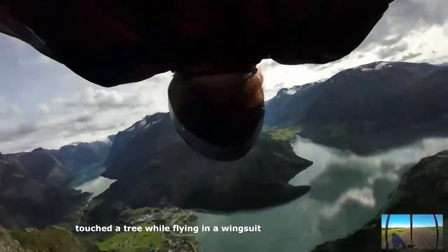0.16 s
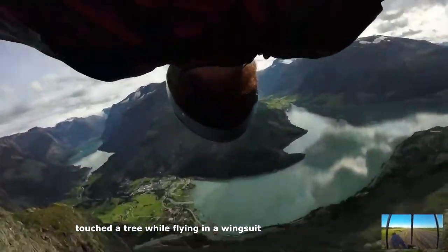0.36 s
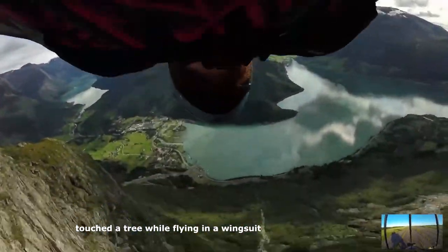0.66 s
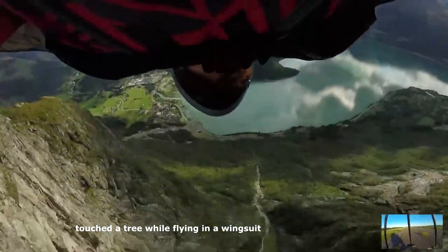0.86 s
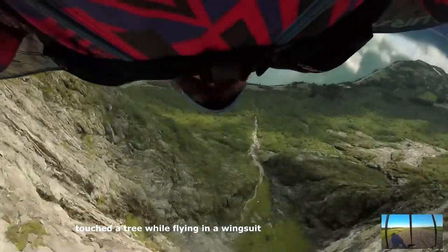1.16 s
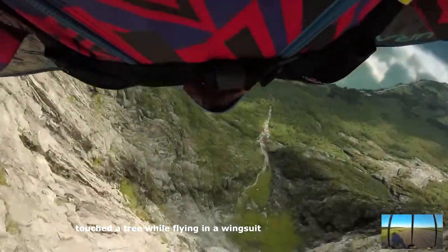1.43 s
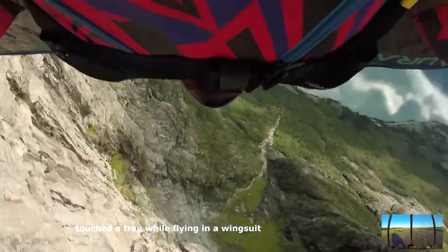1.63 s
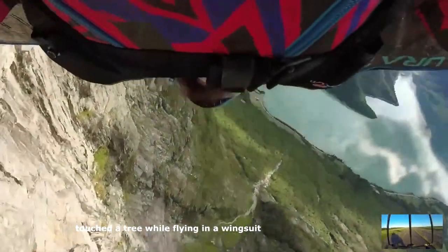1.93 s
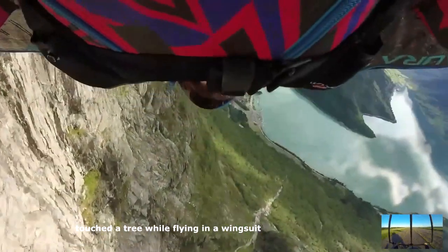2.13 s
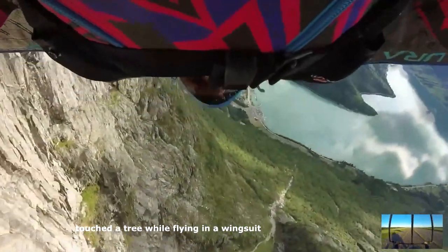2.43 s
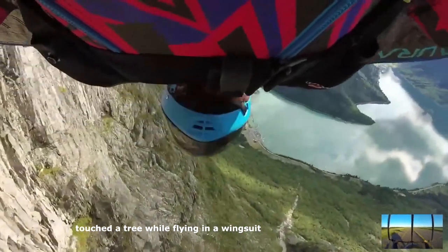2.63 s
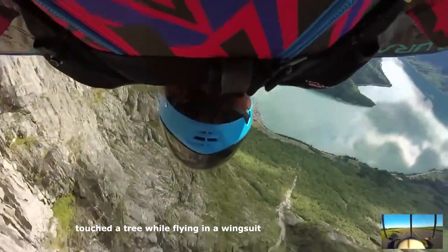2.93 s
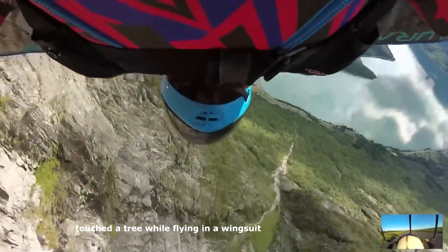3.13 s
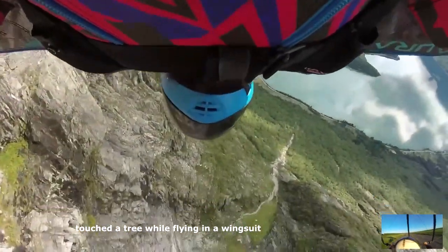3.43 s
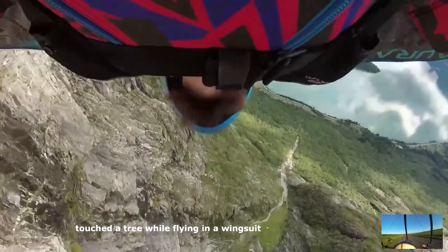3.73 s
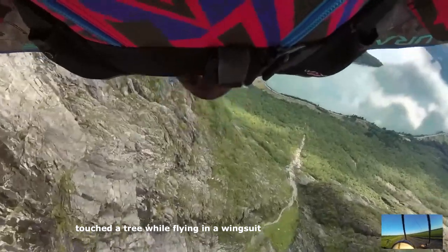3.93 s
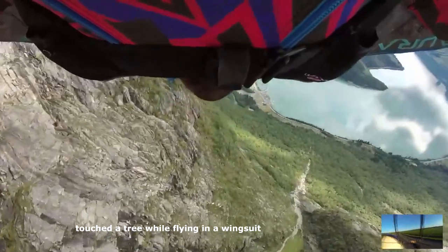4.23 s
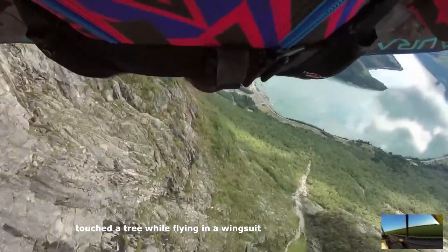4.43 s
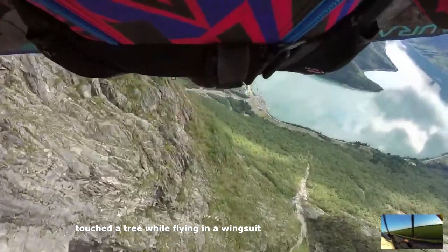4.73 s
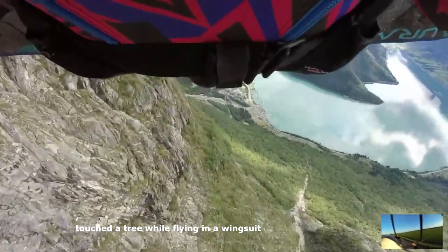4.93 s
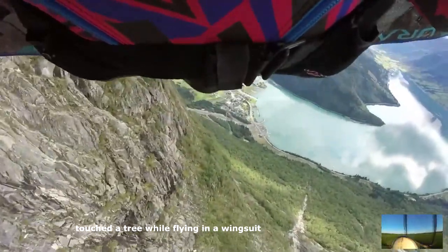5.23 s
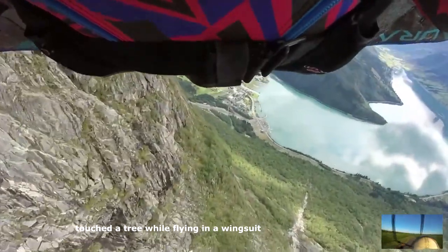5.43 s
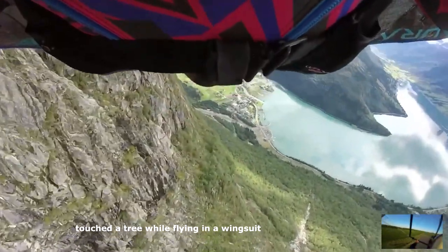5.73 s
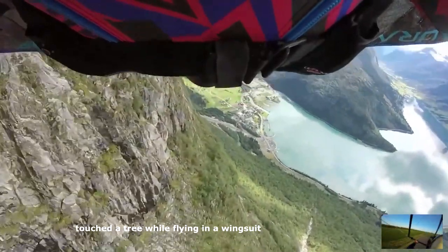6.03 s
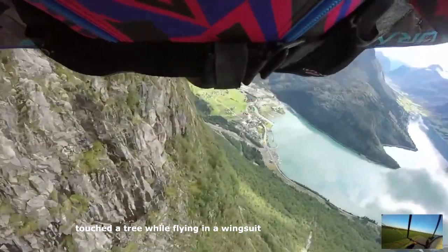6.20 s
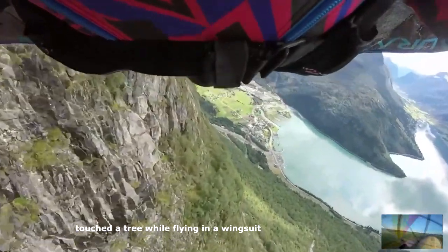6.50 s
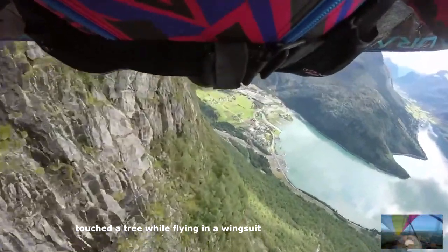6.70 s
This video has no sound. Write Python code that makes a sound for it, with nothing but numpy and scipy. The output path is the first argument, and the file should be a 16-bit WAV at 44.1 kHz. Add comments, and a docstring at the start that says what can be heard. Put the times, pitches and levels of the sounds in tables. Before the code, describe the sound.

Continuous close wind noise in high-speed flight: low turbulent roar, deep soft thumps, brief rough slaps, and airy hiss that brightens and dulls.

```python
"""Air tears past a body-worn camera during a fast wingsuit glide along a cliff, right at the microphone.
Eddies buffet the diaphragm with a low roar: noise in bursts, split into large and small eddies.
Fine turbulence rushes and hisses through the hollows of the camera housing: filtered noise with resonances.
Behind these lie the rumble of the body's wake, damped single thumps and short slaps of rough air.
The airstream flutters, and brightens or dulls as the flyer's posture turns the camera in and out of it."""
import sys
import numpy as np
from scipy import signal
from scipy.fft import rfft, irfft
from scipy.io import wavfile
from scipy.ndimage import uniform_filter1d, map_coordinates

SR = 44100
rng = np.random.default_rng(int(sys.argv[2]) if len(sys.argv) > 2 else 0)


def to_wav(s):
    """Save 16-bit WAV."""
    ch = np.atleast_2d(s).T  # columns
    pcm = np.round(np.clip(ch, -1, 1) * 32767)  # PCM
    wavfile.write(sys.argv[1], SR, pcm.astype(np.int16))


N = 302526

# slow pressure swings in the flyer's wake: t/s, level/dB
WAKE_LEVEL = [(0, -45), (0.3, -36.5), (0.7, -40.5), (1.6, -40.5), (2.8, -37), (4.5, -42), (6.25, -41.5),
              (6.6, -36.5), (6.86, -46)]
# filter of the wake: f/Hz, relative level/dB
WAKE_SPECTRUM = [(10, -43), (22, 3), (40, 13.5), (62, 14.5), (85, 10), (130, 6.5), (300, -53)]
# pockets of rough air: t/s, level/dB, half length/s
ROUGH_AIR_SLAPS = [(0.082, -54.5, 0.018), (0.226, -53, 0.0045), (0.346, -37.5, 0.024), (0.378, -40.5, 0.01),
                   (0.455, -45.5, 0.028), (0.598, -47, 0.03), (0.616, -50.5, 0.25), (0.721, -42.5, 0.013),
                   (0.86, -52, 0.057), (1.4, -48.5, 0.22), (2.445, -42.5, 0.038), (2.553, -41.5, 0.017),
                   (2.936, -45.5, 0.06), (3.227, -41, 0.006), (3.406, -46, 0.015), (3.989, -54, .01),
                   (4.22, -46.5, 0.089), (4.553, -42.5, 0.018), (5.14, -38, 0.011), (5.335, -44, 0.046),
                   (5.688, -42.5, 0.0076), (5.91, -46, .014), (6.147, -46, 0.016), (6.472, -44, 0.011)]
# filter of the rough air: f/Hz, relative level/dB
SLAP_SPECTRUM = [(150, -23), (350, 15), (650, 7.5), (900, -6), (1500, -12.5), (2100, -20)]
# single large eddies that thump the microphone: t/s, level before damping/dB, swing f/Hz
EDDY_THUMPS = [(0.077, -28.5, 35.8), (.221, -21, 28), (0.244, -18, 35), (0.335, -22, 59.6),
               (0.588, -16, 90), (0.731, -22, 45.5), (0.836, -19, 70), (.945, -21.5, 35), (2.569, -14, 72),
               (2.786, -22, 61.4), (3.173, -16.5, 85), (3.662, -17, 92), (3.896, -27, 110),
               (4.344, -26, 110), (4.831, -26, 110), (5.39, -21, 100), (5.683, -30, 90), (6.59, -32, 50)]

# strength of the airstream over the housing, read against CRUISE_STREAM_DB: t/s, level/dB
STREAM_LEVEL = [(0, -66.5), (0.06, -74), (0.23, -70), (0.4, -70.5), (0.66, -72.5), (0.82, -68),
                (0.96, -63.5), (1.06, -60), (1.14, -55.5), (1.24, -54.5), (1.4, -56.5), (1.64, -58.5),
                (1.92, -62.5), (2.12, -60.5), (2.26, -59.5), (2.62, -62.5), (2.72, -60.5), (2.85, -59),
                (2.97, -57), (3.13, -64.5), (3.33, -66.5), (3.43, -65.5), (3.5, -66.5), (3.69, -66.5),
                (3.85, -64), (4.25, -59.5), (4.45, -62.5), (4.72, -60), (4.8, -59.5), (5.35, -60),
                (5.55, -62.5), (5.85, -63.5), (6.47, -64), (6.54, -58.5), (6.86, -60)]
# filter of the rush over the housing: f/Hz, relative level/dB
RUSH_SPECTRUM = [(400, 10), (800, 6.5), (1100, 3), (1400, 1.5), (1900, 0.5), (2250, -10), (3000, -27.5),
                 (4200, -32)]
# filter of the hiss: f/Hz, relative level/dB
HISS_SPECTRUM = [(1200, 2.5), (2200, 6), (3600, -1), (4000, -4.5), (4700, -3), (5300, -2.5), (6400, -3.5),
                 (7200, -7), (8500, -10), (10200, -16), (11300, -21), (12500, -24), (13500, -30),
                 (15500, -33)]
# air resonances of the housing: f/Hz, width/Hz, lift/dB
HOUSING_HOLLOWS = [(2660, 76, 3), (2850, 99, 5.5), (2980, 72, 4.5), (3207, 140, 6), (3670, 336, 8.5),
                   (4220, 390, 5.5), (6350, 820, 3.5)]
# share of the hiss that is top treble: f/Hz, level/dB
SHEEN_SPECTRUM = [(4500, -50), (7000, -13), (9000, -3.5), (11000, 0), (20000, 0)]
# level of the top treble against the rest of the hiss: t/s, level/dB
SHEEN_LEVEL = [(0, 6), (.12, -11), (.25, 5), (.33, -25), (.65, -25), (.85, -11), (1.05, -10), (1.25, 1.5),
               (1.6, 2.5), (2.05, -6), (3.3, 4), (5.8, 6), (6.86, 5.5)]
# the air lets go of the camera for an instant (a negative drop is a rise):
# t/s, half length/s, drop of stream/dB, drop of buffet/dB
AIR_LULLS = [(0.188, 0.051, -1, 16), (0.283, 0.021, -0.5, 16), (0.412, .012, -1.5, 0.5),
             (0.556, 0.014, -1, 0), (0.809, 0.016, 3, 7), (0.943, 0.016, -1, 2), (0.995, .02, -1, 4),
             (2.033, 0.043, 6, 0), (2.33, .016, 0.5, 4), (2.602, 0.033, 4, 5.5), (3.475, 0.012, 9, 3.5),
             (3.616, 0.018, 6.5, -0.5), (3.685, 0.011, 8, 1.5), (3.735, 0.032, 2.5, 0.5),
             (4.369, 0.013, 4, -1), (4.671, .016, 3.5, 4.5), (4.715, 0.046, 3, 0), (5.414, .014, 3, 4),
             (5.8, 0.026, 5.5, 1)]

# force of the large eddies on the microphone: t/s, level/dB
BUFFET_LEVEL = [(0, -53), (0.235, -28.5), (0.35, -30), (0.46, -26.5), (0.54, -32.5), (0.87, -32.5),
                (0.97, -41.5), (1.28, -30), (1.45, -30), (1.75, -32), (2.0, -34.5), (2.31, -37.5),
                (2.40, -32.5), (2.68, -34), (3.0, -34.5), (3.55, -32.5), (4.75, -33.5), (5.25, -32.5),
                (5.45, -32.5), (5.85, -32.5), (6.18, -31), (6.42, -31), (6.86, -30.5)]
# filter of the buffeting: f/Hz, relative level/dB
BUFFET_SPECTRUM = [(45, -39), (80, -3), (120, 0), (170, -0.5), (250, -3.5), (400, -7.5), (520, -9.5),
                   (630, -12.5), (800, -23.5), (1100, -33.5), (2000, -57.5)]
# pace at which the large eddies sweep past, higher late in the glide as it gathers speed: t/s, ratio
LARGE_EDDY_PACE = [(0, 0.96), (1.3, 1.01), (3.6, .98), (4.6, 1.033), (6.2, 1.15), (6.86, 1.13)]
# the air shoves the microphone in a short, deep gust: t/s, half length/s, rise of buffet/dB
AIR_SHOVES = [(0.242, .018, 0), (0.343, .025, 1), (0.676, 0.02, 3), (1.03, .02, 0), (2.006, 0.011, 6),
              (2.387, 0.026, 4), (2.988, .022, 4), (3.433, 0.017, 2), (3.58, 0.012, 4), (3.9, 0.016, 5),
              (4.563, 0.011, 4.5), (4.642, 0.016, 4), (5.87, 0.018, -0.5), (6.207, 0.019, 2)]

CRUISE_STREAM_DB, CRUISE_BUFFET_DB = -61.5, -30.5  # steady flight; the rules below count from here
# small eddies: level in steady flight, dB gained per dB of buffet and per dB of stream
SMALL_DB, SMALL_PER_BUFFET, SMALL_PER_STREAM = -37.5, 0.59, 0.63
RUSH_DB, RUSH_PER_STREAM = -55, 1  # likewise for the rush
HISS_DB = -61  # hiss in steady flight, before the top treble is adjusted
GUST_DB, GUST_HZ = 0.79, 5.3  # random wavering of the stream: rms depth, corner rate
LUMP_DB, LUMP_HZ = 0.88, 8.3  # random lumps in the buffet: rms depth, corner rate
# a weak stream clings badly and flutters: depth in steady flight, depth per dB of slack, greatest depth
FLUTTER_DB, FLUTTER_PER_SLACK, FLUTTER_MAX_DB = 0.8, 0.48, 1.5
SHELTERED_FLUTTER = 0.82  # share of the flutter before the air grazes the housing
GRAZING_FROM_S, GRAZING_FULL_S = 0.28, 1.24  # air begins to graze the hollows, and rings them fully
ROAR_BALANCE_DB, RUSH_BALANCE_DB = 1.21, 0.73  # left minus right
TOP_HZ = 15400


def undb(db):
    """Decibels to gain."""
    return 10 ** (np.asarray(db) / 20)


def curves(table):
    """Each column of a table as a line through time."""
    s, *columns = np.transpose(table)
    return [np.interp(np.arange(N) / SR, s, column) for column in columns]


def bins():
    """Frequency of each spectral bin in Hz, kept at 1 or above."""
    return np.maximum(np.arange(N // 2 + 1) * SR / N, 1)


def band(x, lo_hz, hi_hz):
    """The part of a sound between two frequencies."""
    inside = (bins() >= lo_hz) & (bins() < hi_hz)
    return irfft(rfft(x) * inside, N)


def unit(x, span_hz):
    """Scale a sound so that the given band has rms 1."""
    return x / np.std(band(x, *span_hz))


def colour(x, points, resonances=()):
    """Filter by a smooth spectrum with resonant humps; above its last point it loses 24 dB per octave."""
    hz, db = np.transpose(points)
    shape_db = np.interp(np.log(bins()), np.log(hz), db)
    shape_db = shape_db - 24 * np.log2(np.maximum(bins() / hz[-1], 1))
    for centre_hz, width_hz, lift_db in resonances:
        shape_db = shape_db + lift_db / (1 + (2 * (bins() - centre_hz) / width_hz) ** 2)
    return irfft(rfft(x) * undb(shape_db), N)


def walk(rate_hz):
    """Random wavering, mostly below a given rate, with spread 1."""
    lowpass = 1 / np.sqrt(1 + (bins() / rate_hz) ** 4)
    no_drift = bins() / (bins() + 2)
    wavering = irfft(rfft(rng.standard_normal(N)) * lowpass * no_drift, N)
    return wavering / np.std(wavering)


def sustained(x, seconds):
    """Even out the slow swells of a turbulence, leaving its quick grain."""
    size = int(seconds * SR)
    power = uniform_filter1d(uniform_filter1d(x ** 2, size), size)
    return x / np.sqrt(power + 1e-18)


def eddies(grain_db):
    """Turbulent pressure: noise that comes in bursts of a few milliseconds."""
    return rng.standard_normal(N) * undb(grain_db * walk(310))


def swept(x, pace):
    """Carry a turbulence past at a changing pace: the faster, the higher it sounds."""
    position = np.cumsum(pace) % (N - 1)
    return map_coordinates(x, [position], mode="mirror")


def bell(s, half_s):
    """A smooth rise and fall around a moment, down to 1/e at half_s from it."""
    return np.exp(-((np.arange(N) / SR - s) / half_s) ** 2)


def grazing():
    """How fully the air grazes the housing, 0-1."""
    return np.interp(np.arange(N) / SR, [GRAZING_FROM_S, GRAZING_FULL_S], [0, 1])


def airflow():
    """Stream against steady flight, its quick flutter, and the force of the buffet, all in dB."""
    flow_db = curves(STREAM_LEVEL)[0] - CRUISE_STREAM_DB
    depth_db = np.clip(FLUTTER_DB - FLUTTER_PER_SLACK * flow_db, 0, FLUTTER_MAX_DB)
    exposure = np.interp(grazing(), [0, 1], [SHELTERED_FLUTTER, 1])
    flutter_db = depth_db * exposure * walk(83)
    flow_db = flow_db + GUST_DB * walk(GUST_HZ)
    buffet_db = curves(BUFFET_LEVEL)[0] + LUMP_DB * walk(LUMP_HZ)
    for s, half_s, stream_drop_db, buffet_drop_db in AIR_LULLS:
        lull = bell(s, half_s)
        flow_db = flow_db - stream_drop_db * lull
        buffet_db = buffet_db - buffet_drop_db * lull
    for s, half_s, rise_db in AIR_SHOVES:
        buffet_db = buffet_db + rise_db * bell(s, half_s)
    return flow_db, flutter_db, buffet_db


def wake():
    """Big, slow vortices shed by the body rumble under everything."""
    wake_db, = curves(WAKE_LEVEL)
    rumble = sustained(colour(eddies(grain_db=2.0), WAKE_SPECTRUM), seconds=0.16)
    return unit(rumble, (20, 75)) * undb(wake_db)


def slaps():
    """A pocket of rough air swells against the microphone and is gone."""
    swell = sum(undb(db) * bell(s, half_s) for s, db, half_s in ROUGH_AIR_SLAPS)
    rough_air = colour(eddies(grain_db=2.4), SLAP_SPECTRUM)
    return swell * unit(rough_air, (600, 2500))


def thumps(cycles=0.46):
    """A large eddy gives the diaphragm one heavily damped swing, fading by 1/e in the given cycles."""
    out = np.zeros(N)
    for s, db, hz in EDDY_THUMPS:
        turns = hz * np.maximum(np.arange(N) / SR - s, 0)
        damping = np.exp(-np.minimum(turns / cycles, 20))
        out -= undb(db) * np.sin(2 * np.pi * turns) * damping
    return out


def stream(flow_db, flutter_db, pressure):
    """Fine turbulence rushes over the housing and rings its hollows, pulsing with the roar's pressure."""
    sheen_db, = curves(SHEEN_LEVEL)
    rush = unit(colour(eddies(grain_db=1.9), RUSH_SPECTRUM), (950, 2000))
    fine = eddies(grain_db=1.5)
    plain = unit(colour(fine, HISS_SPECTRUM), (3000, 9000))
    ringing = unit(colour(fine, HISS_SPECTRUM, HOUSING_HOLLOWS), (3000, 9000))
    hiss = plain + grazing() * (ringing - plain)
    # the finest turbulence comes in quick spurts: raise or lower the top treble already in the hiss
    sheen = colour(ringing, SHEEN_SPECTRUM)
    spurts = undb(sheen_db + 1.4 * walk(160))
    hiss = hiss + sheen * (spurts - 1)
    pulsing = undb(flutter_db + 0.17 * pressure)
    rush_gain = undb(RUSH_DB + RUSH_PER_STREAM * flow_db)
    hiss_gain = undb(HISS_DB + flow_db)
    return rush * pulsing * rush_gain, hiss * pulsing * hiss_gain


def buffet(flow_db, flutter_db, buffet_db):
    """Eddies strike the microphone; the small ones grow with both the buffet and the stream."""
    small_db = SMALL_DB + SMALL_PER_BUFFET * (buffet_db - CRUISE_BUFFET_DB) + SMALL_PER_STREAM * flow_db
    pressure = colour(eddies(grain_db=2.1), BUFFET_SPECTRUM)
    large = band(pressure, 0, 340)
    small = sustained(pressure - large, seconds=0.089)
    pace, = curves(LARGE_EDDY_PACE)
    large = sustained(swept(large, pace), seconds=0.05)
    large = unit(large, (90, 330)) * undb(buffet_db + 0.5 * flutter_db)
    small = unit(small, (350, 800)) * undb(small_db + flutter_db)
    return large + small


def scene():
    """One airflow drives buffet, rush and hiss; roar and rush sit a little left, the hiss central."""
    flow_db, flutter_db, buffet_db = airflow()
    roar = wake() + slaps() + thumps() + buffet(flow_db, flutter_db, buffet_db)
    rush, hiss = stream(flow_db, flutter_db, pressure=sustained(roar, seconds=0.2))
    left_right = np.array([[1], [-1]]) / 2
    placed_roar = roar * undb(ROAR_BALANCE_DB * left_right)
    placed_rush = rush * undb(RUSH_BALANCE_DB * left_right)
    return placed_roar + placed_rush + hiss


def record(dry):
    """The camera cuts the top with a steep elliptic lowpass."""
    lowpass = signal.ellip(12, 0.2, 80, TOP_HZ, fs=SR, output="sos")  # ripple and stopband in dB
    return signal.sosfilt(lowpass, dry)


dry = scene()
out = record(dry)
to_wav(out)
```